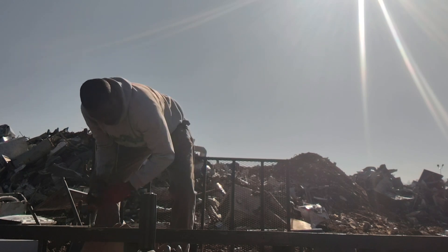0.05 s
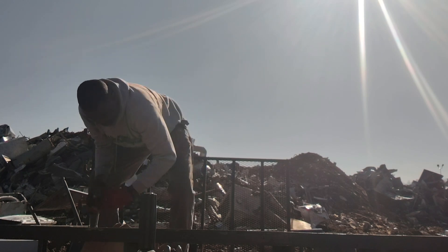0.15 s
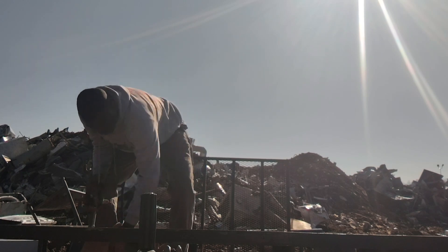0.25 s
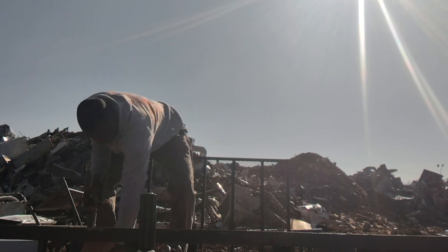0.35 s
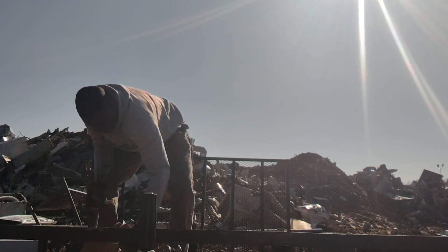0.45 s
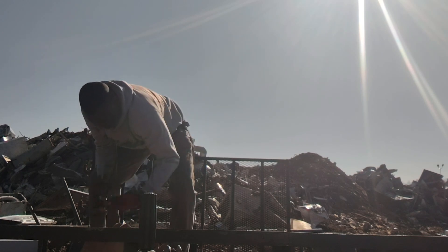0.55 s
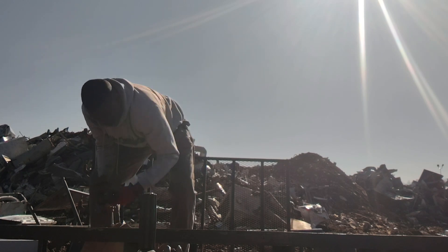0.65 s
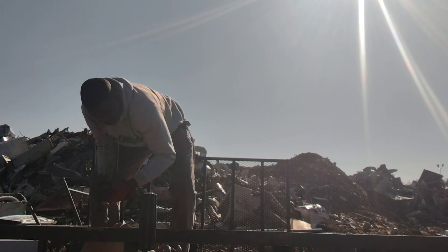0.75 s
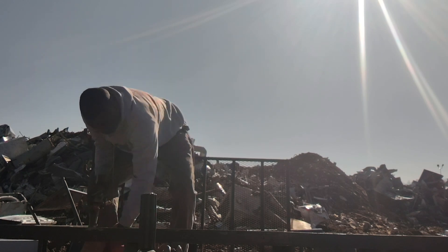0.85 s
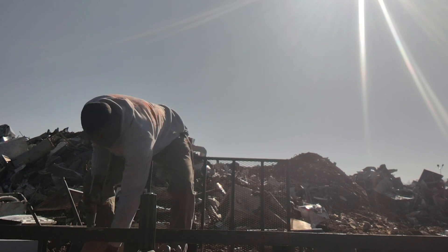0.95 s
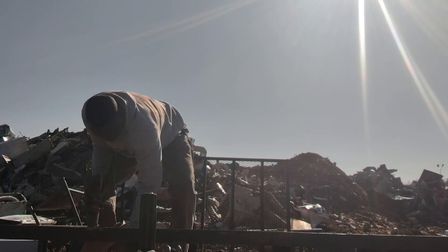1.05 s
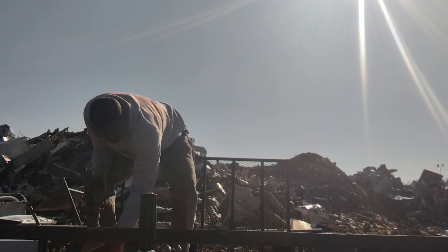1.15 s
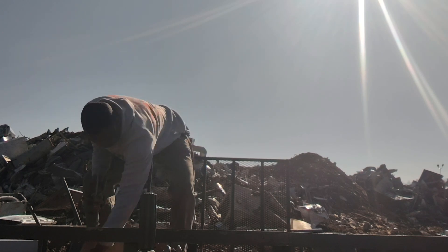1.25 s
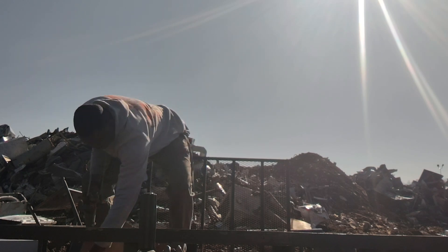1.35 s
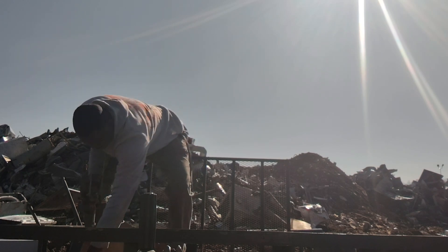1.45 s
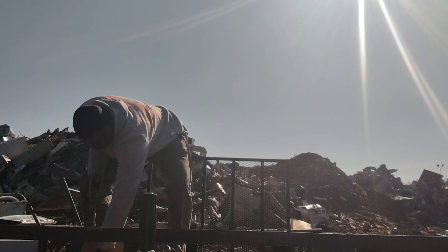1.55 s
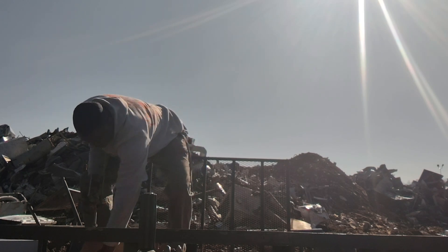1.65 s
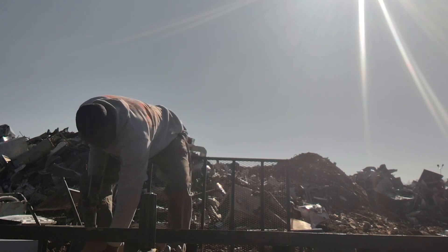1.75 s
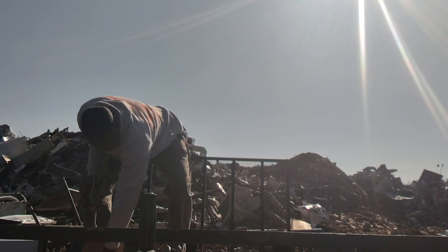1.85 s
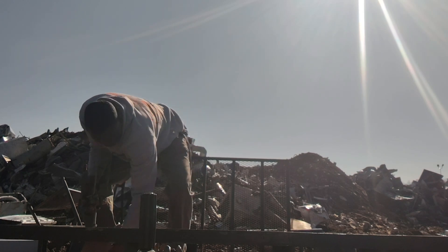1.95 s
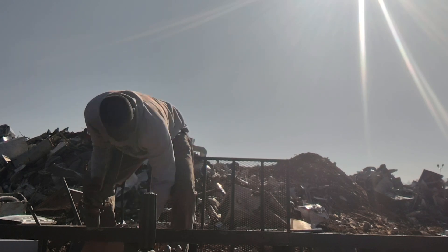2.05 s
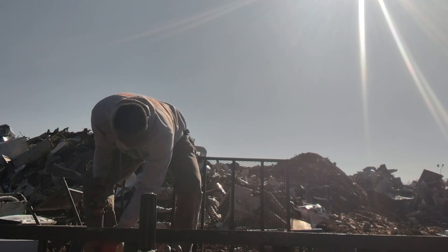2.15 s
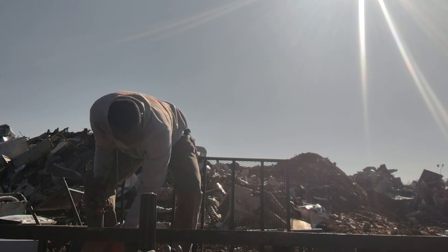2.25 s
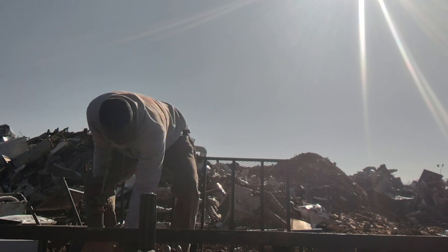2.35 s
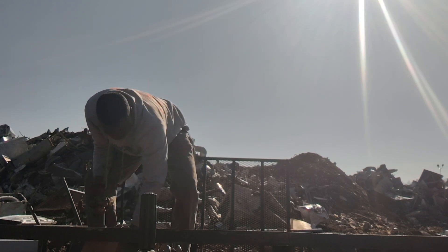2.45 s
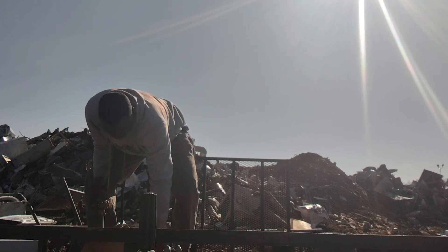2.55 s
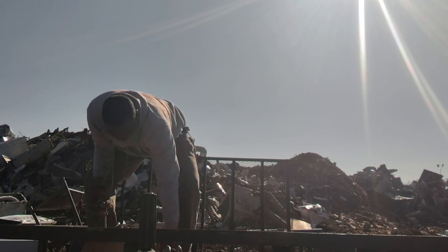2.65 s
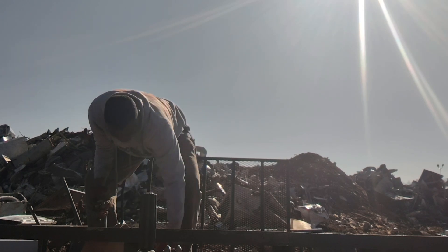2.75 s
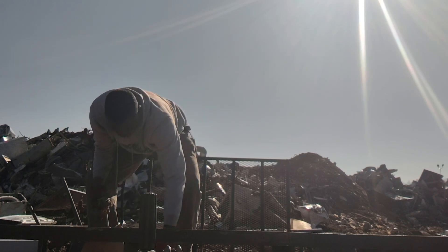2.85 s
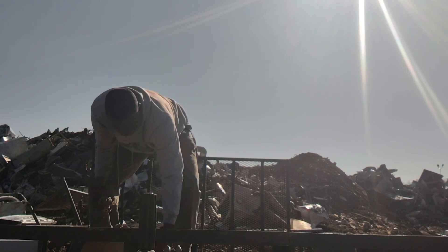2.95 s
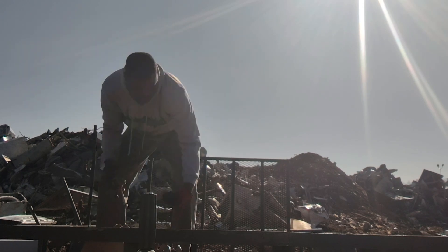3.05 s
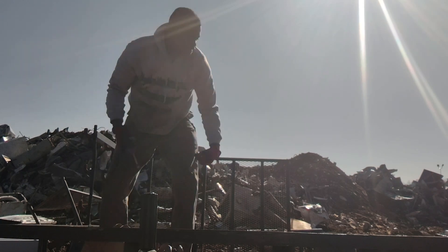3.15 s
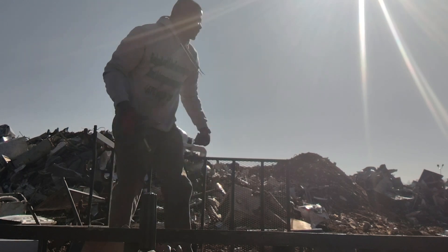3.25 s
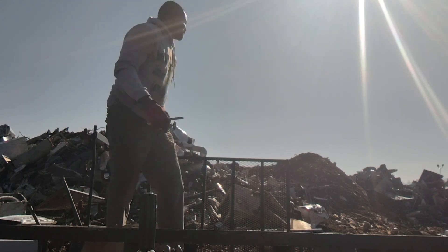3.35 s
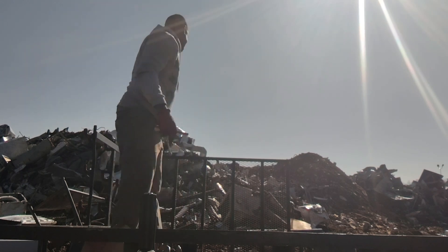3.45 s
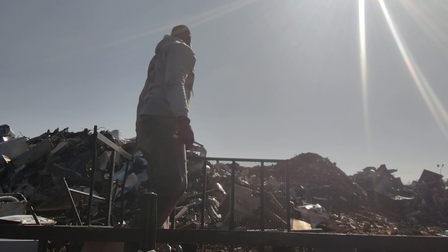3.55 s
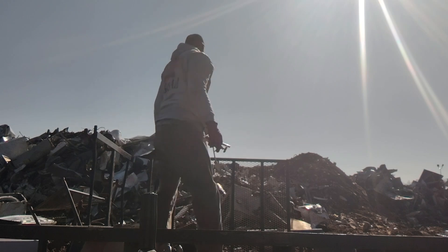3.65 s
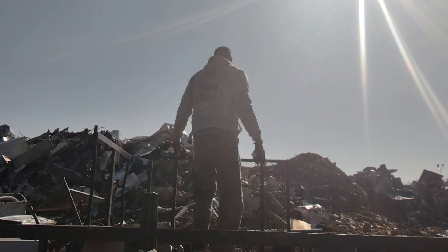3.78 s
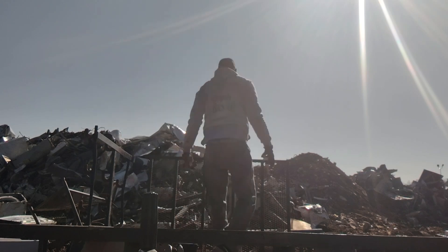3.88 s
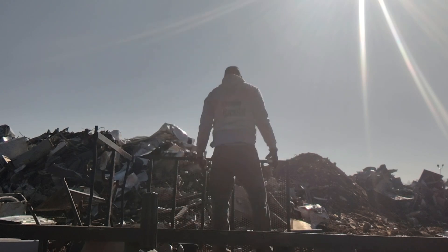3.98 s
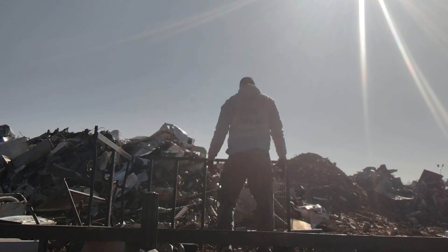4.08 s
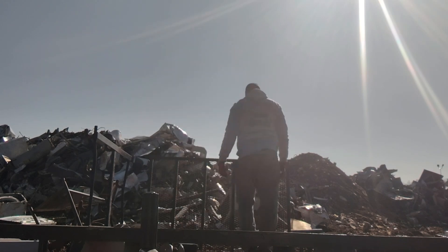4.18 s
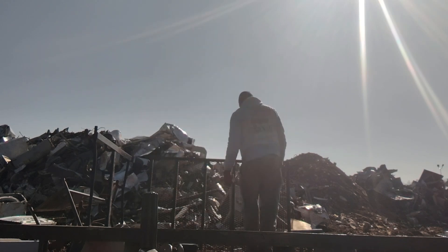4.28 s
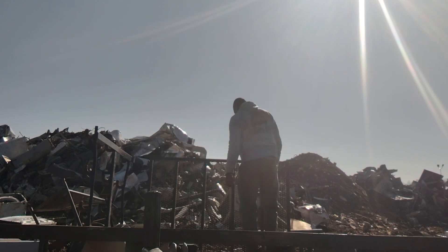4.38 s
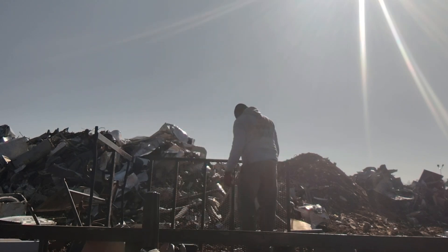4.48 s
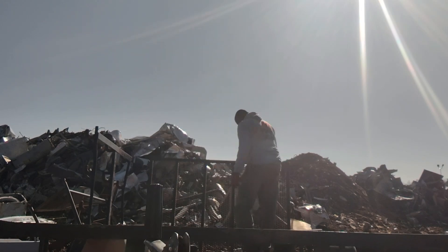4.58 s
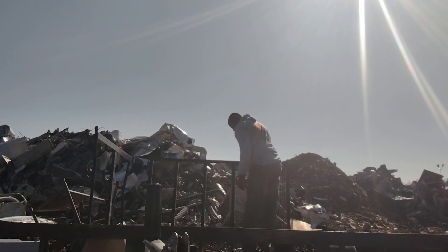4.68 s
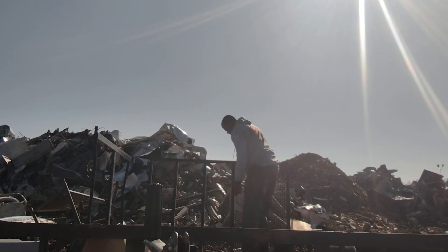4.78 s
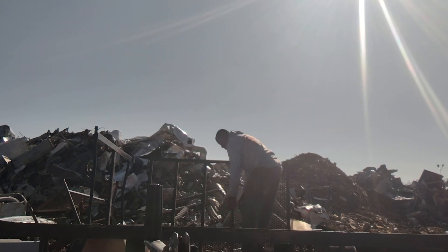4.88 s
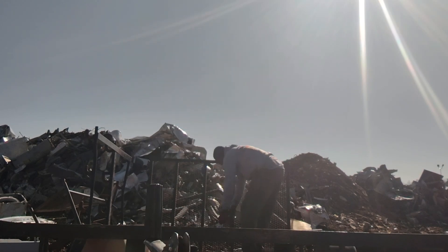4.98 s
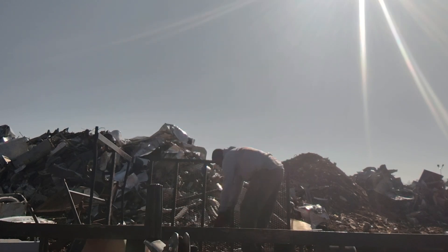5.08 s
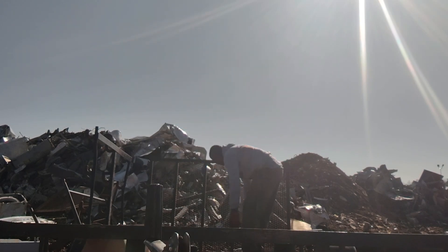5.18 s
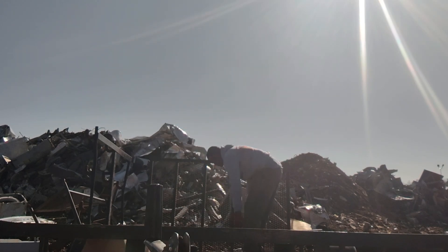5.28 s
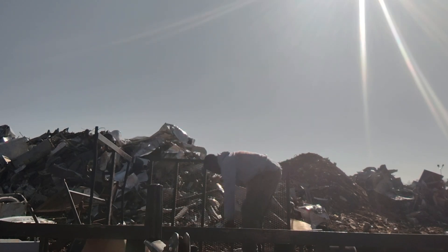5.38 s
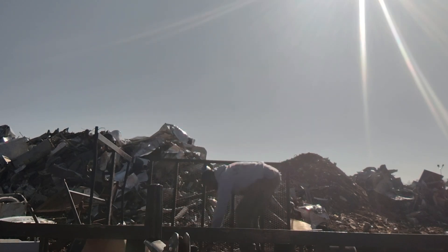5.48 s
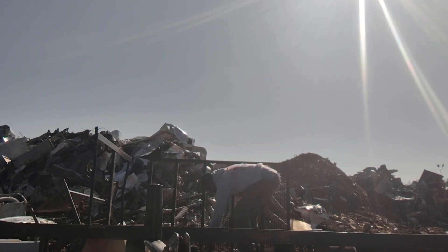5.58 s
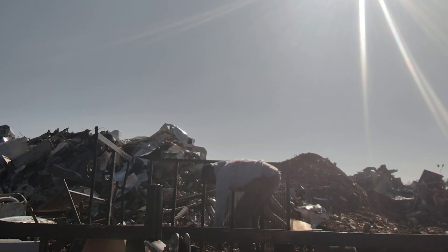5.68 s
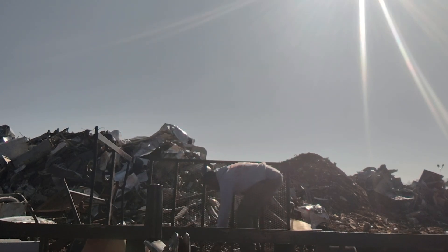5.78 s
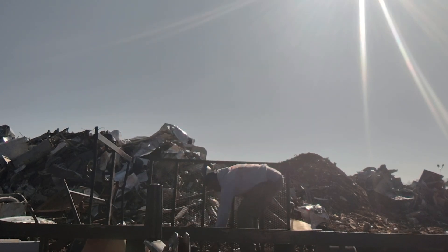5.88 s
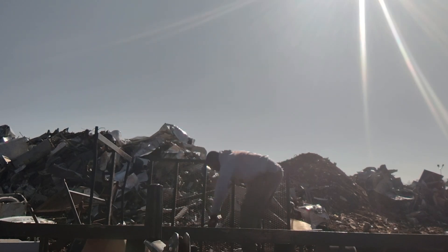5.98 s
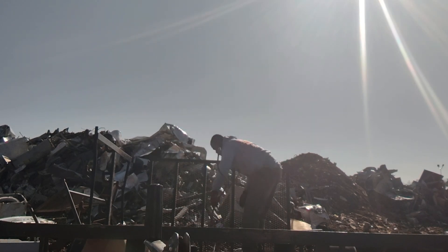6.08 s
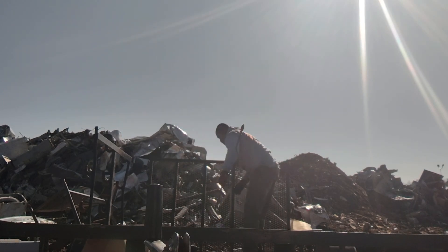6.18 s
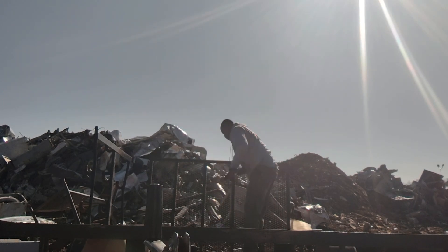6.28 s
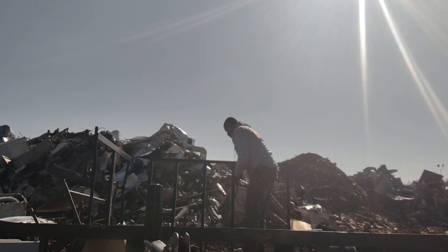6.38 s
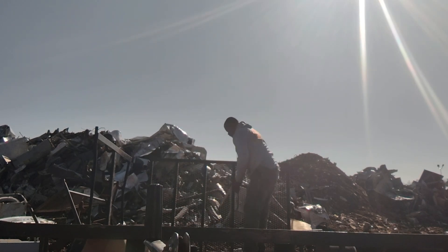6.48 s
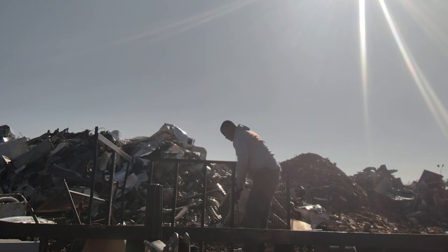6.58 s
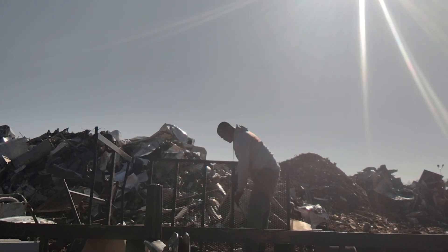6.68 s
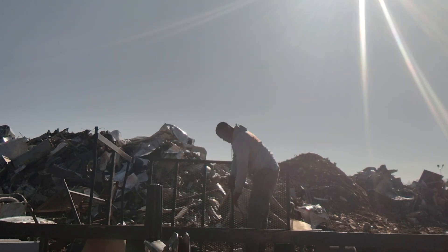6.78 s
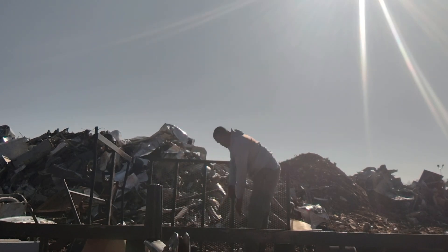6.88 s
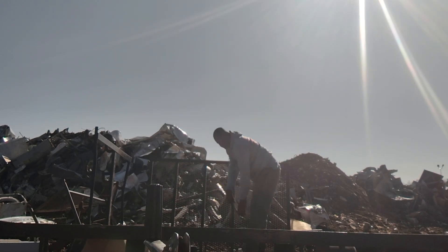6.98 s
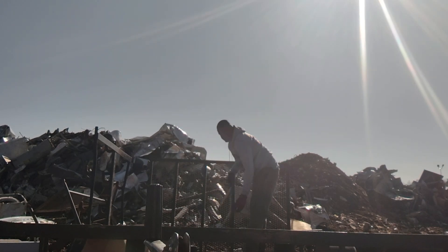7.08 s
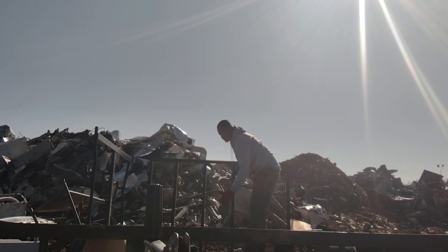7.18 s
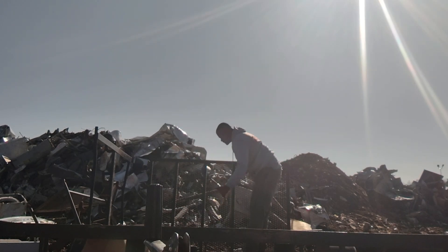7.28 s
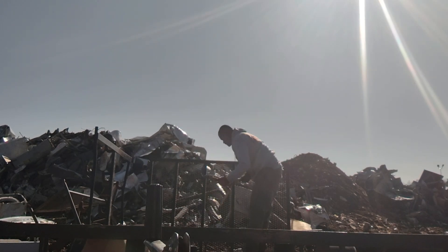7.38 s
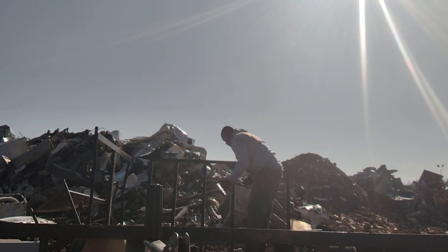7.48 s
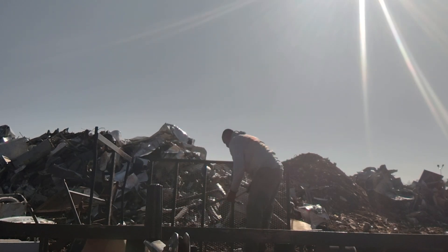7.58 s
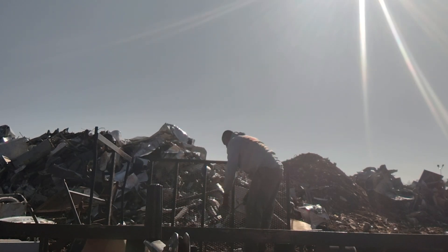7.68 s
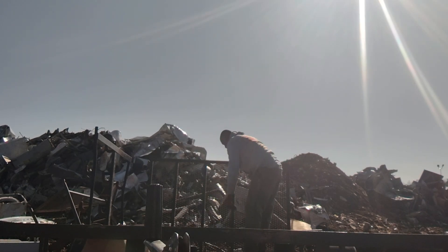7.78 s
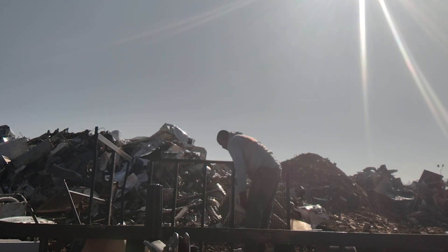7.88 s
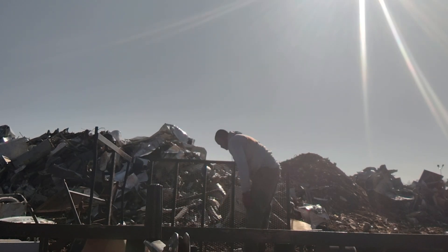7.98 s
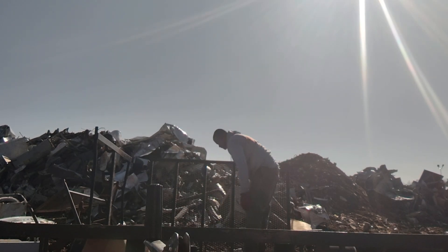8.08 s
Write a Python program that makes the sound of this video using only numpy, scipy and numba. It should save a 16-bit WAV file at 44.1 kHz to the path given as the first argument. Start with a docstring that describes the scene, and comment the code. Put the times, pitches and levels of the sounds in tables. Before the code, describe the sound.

Scrap metal shifted by hand outdoors: bright clanks and ringing pieces, knocks and scrapes on a trailer deck, heavier crashes near the middle and end.

```python
"""Shifting metal at a scrapyard

A worker shifts metal on a trailer in front of a two-microphone camera: knocks ring short modes of damped sheet,
and random contacts scuff the deck. To the right, clanks, rattles and thuds drive modes of scrap on a heap.
Some pieces there ring on with freely decaying modes; rubbed pieces squeal by stick-slip on a single mode.
A machine hums with wavering sine lines far to the left, over the filtered noise of the yard."""
import sys
import numpy as np
from scipy import signal
from scipy.fft import rfft, irfft, next_fast_len
from scipy.io import wavfile
from scipy.ndimage import uniform_filter1d
from numba import njit

SR = 44100
rng = np.random.default_rng(int(sys.argv[2]) if len(sys.argv) > 2 else 0)


def makeup_ratio(level_db):
    """Linear amplitude ratio for a level in decibels (20 dB per factor of ten)."""
    decades = np.asarray(level_db, float) / 20
    return 10 ** decades


def put_to_file(sound):
    """Save the sound as 16-bit audio at rate SR, in the file named by the first command-line argument."""
    columns = np.atleast_2d(sound).T  # one column per channel
    safe = np.clip(columns, -1, 1)
    whole_steps = np.round(safe * 32767)
    wavfile.write(sys.argv[1], SR, whole_steps.astype(np.int16))


N = 358533
T = np.arange(N) / SR
SHRILL_HZ, THIN_HZ, LOW_HZ, BRIEF_HZ = 11029, 4208, 1060, 4130  # modes named in the table of squeals


def colour(x, points):
    """Minimum-phase filtering: folding the cepstrum makes the response through (Hz, dB) points causal."""
    hz, db = np.transpose(points)
    grid = np.linspace(1, SR / 2, 1025)
    log_gain = np.interp(np.log(grid), np.log(hz), db) * np.log(10) / 20
    cepstrum = irfft(log_gain)
    cepstrum[1:1024] *= 2
    cepstrum[1025:] = 0
    impulse = irfft(np.exp(rfft(cepstrum)))
    return signal.fftconvolve(x, impulse)[:len(x)]


def unit(x):
    """Power normalisation: scales x to an rms of one."""
    return x / np.sqrt(np.mean(x ** 2) + 1e-18)


@njit
def ring(x, hz, gain, t60):
    """Modal superposition: a bank of exponentially decaying resonators driven by x."""
    y = np.zeros(len(x))
    for k in range(len(hz)):
        pole = np.exp((2j * np.pi * hz[k] - np.log(1000) / t60[k]) / SR)
        state = 0j
        for i in range(len(x)):
            state = state * pole + x[i]
            y[i] += gain[k] * state.imag
    return y


def add(out, start_s, x):
    """Linear superposition: mixes x into out from start_s."""
    first = int(start_s * SR)
    out[first:first + len(x)] += x[:max(len(out) - first, 0)]


def walk(rate):
    """Slow random modulation: levels held for 1 / rate s and slewed twice, with a spread near 1."""
    hold = int(SR / rate)
    steps = np.repeat(rng.standard_normal(N // hold + 1), hold)
    return 1.7 * uniform_filter1d(uniform_filter1d(steps, hold), hold)[:N]


def chatter(size, spread_db):
    """Random contact mechanics: dense tiny contacts, a few much stronger than the rest."""
    strength_db = np.minimum(spread_db * rng.exponential(size=size), 14)
    return rng.standard_normal(size) * makeup_ratio(strength_db)


def patter(rate, spread_db, t60):
    """Poisson-like impacts: scattered small taps, rate per second, swell a bed of fine contact noise."""
    strength_db = np.minimum(spread_db * rng.exponential(size=N), 15)
    taps = (rng.random(N) < rate / SR) * makeup_ratio(strength_db)
    bursts = signal.fftconvolve(taps, fade(t60, 0.0001, 1600))[:N]
    return chatter(N, spread_db=1.5) * (1 + 1.1 * bursts)


def fade(t60, rise_s, size, bend=1.0):
    """Energy decay: a quick rise, then a fall in dB; bend over 1 drops late, as bouncing scrap settles."""
    t = np.arange(size) / SR
    fall_db = -60 * (t / np.clip(t60, .02, 2)) ** bend
    return (1 - np.exp(-t / rise_s)) * makeup_ratio(fall_db)


def scrap(x, lo_hz, hi_hz, t60, dry, count):
    """Modal density: every bit of scrap has its own crowd of short modes, over the bare contact noise."""
    place_in_span = (np.arange(count) + rng.random(count)) / count
    hz = lo_hz * (hi_hz / lo_hz) ** place_in_span
    t60 = t60 * makeup_ratio(2 * rng.standard_normal(count))
    mode_db = 4 * rng.standard_normal(count)
    modes = ring(x, hz, makeup_ratio(mode_db) / np.sqrt(t60), t60)
    return unit(modes) + dry * unit(x)


def machine():
    """Tonal radiation over broadband noise: distant motor lines waver over the rumble and hiss of the yard."""
    # motor lines: hz, level_db
    motor_lines = [(181, -48), (285, -54.5), (322, -48.5), (642, -58)]
    # spectrum of the yard noise: hz, level_db
    yard_spectrum = [(100, -31), (165, -25), (290, -6.5), (380, -12.5), (1400, -24.5), (3200, -30.5),
                     (7000, -43.5), (16000, -58)]
    yard_db = -46.5
    hum = np.zeros(N)
    for hz, db in motor_lines:
        level = np.sqrt(2) * makeup_ratio(db + 1.8 * walk(14))
        phase = 2 * np.pi * np.cumsum(hz * (1 + 0.0034 * walk(3))) / SR
        hum += level * np.sin(phase)
    yard = unit(colour(rng.standard_normal(N), yard_spectrum))
    return hum + makeup_ratio(yard_db + walk(1.1)) * yard


def loose(axis):
    """Addition of powers: level of loose scrap (axis 0 deck, 1 heap), a restless bed plus swelling shifts."""
    # restless bed of loose scrap under the shifts: time_s, deck_scuff_db, heap_rattle_db
    restless = [(0, -42, -59.5), (2.6, -46, -71), (3.6, -52, -59), (5.7, -38.5, -57.5), (6.229, -41.5, -51),
                (6.57, -53, -67), (7.31, -81.5, -68.5), (8.13, -65, -88.5)]
    # a load of loose scrap shifts: loudest_s, deck_scuff_db, heap_rattle_db
    load_shifts = [(1.65, -29, -48), (2.17, -27, -37), (2.87, -32, -43.5), (4.19, -33.5, -69),
                   (4.82, -37.5, -44.5), (4.98, -35, -61), (5.53, -32, -32), (7.0, -44.5, -56.5),
                   (7.95, -48, -42.5), (8.1, -26.5, -48)]
    swell_db_per_s, settle_db_per_s = ((88, 108), (63.5, 144))  # each (deck, heap)
    bed = np.transpose(restless)
    power = makeup_ratio(np.interp(T, bed[0], bed[axis + 1])) ** 2
    for loudest_s, *db in load_shifts:
        rising_db = swell_db_per_s[axis] * (loudest_s - T)
        falling_db = settle_db_per_s[axis] * (T - loudest_s)
        power += makeup_ratio(db[axis] - np.where(T < loudest_s, rising_db, falling_db)) ** 2
    return np.sqrt(power)


def squeals(rows):
    """Stick-slip locked to one mode: a slightly rough sine that swells and lets go."""
    start_db, end_db = -11.5, -26.5  # against the loudest moment
    out = 0
    for start_s, loudest_s, end_s, hz, db in rows:
        on = uniform_filter1d(1. * ((T > start_s) & (T < end_s)), size=200)
        shape_db = np.interp(T, [start_s, loudest_s, end_s], [start_db, 0, end_db])
        level = np.sqrt(2) * on * makeup_ratio(db + shape_db + 0.7 * walk(90))
        out = out + level * np.sin(2 * np.pi * hz * T + .15 * walk(60))
    return out


def thuds():
    """Low-mode excitation: a soft, heavy push of noise rings a few modes of a hollow body."""
    # heavy thuds: start_s, peak_db, t60_s
    heavy_blows = [(0.041, -17.5, 0.39), (0.155, -4.5, 0.44), (1.974, -30, 0.85), (5.579, -11.5, 0.92),
                   (5.619, -15, 0.33)]
    # modes of the hollow body: hz, width_hz, level_db
    hollow_modes = [(342, 21, -18.5), (458, 33, -3.5), (491, 99, 4.5), (620, 110, -5), (756, 120, -9.5)]
    hz, width_hz, mode_db = np.transpose(hollow_modes)
    out, size = np.zeros(N), SR // 2
    for s, db, t60 in heavy_blows:
        envelope = fade(t60, 0.00054, size) + 3 * fade(0.045, 0.0003, size)
        push = rng.standard_normal(size) * envelope
        # a wider mode dies sooner
        sound = ring(push, hz, makeup_ratio(mode_db) * np.sqrt(width_hz), 3.8 / width_hz)
        add(out, s, makeup_ratio(db) * sound / np.abs(sound).max())
    return out


def pieces():
    """Free vibration: each blow rebalances a piece's modes; bounces roughen them until a touch damps the ring."""
    # four ringing pieces, each a list of modes: hz, level_db, t60_s
    # and then a list of blows: start_s, level_db, rings_freely_for_s
    ringing_pieces = [ ([(3450, -1, 0.67), (4054, -2, 0.18), (5712, -1, 0.058), (6444, -23, 0.25),
                      (6850, -7.5, 0.18), (8590, -9, 0.39), (10590, -7, 0.13), (11920, -12, 0.12),
                      (12400, -7, .1), (2153, -17, 0.18)], [(0.426, -15.5, 0.29), (0.455, -17.5, 0.25),
                      (0.49, -26, 0.22), (0.76, -24, 0.1)]), ([(1250, -4.5, 0.26), (1322, -10.5, 0.99),
                      (1782, -16.5, 1), (3515, -11, 0.36), (4525, -14, .25), (5071, -26, .3),
                      (5962, -5.5, 0.19), (6778, -19, 0.17), (7693, -25, 0.2), (10530, -26, 0.17)],
                      [(1.487, -18.5, 0.39), (1.524, -18, 0.38), (1.628, -27.5, 0.2)]),
                      ([(700, -17.5, 0.52), (1093, 0.5, 0.37), (1143, -8, 0.29), (1244, -10, 0.37),
                      (1755, -6, 0.27), (3688, -3.5, 0.31), (5416, -12, 0.28), (5868, -14, .25),
                      (6800, -11.5, 0.15)], [(2.094, -24, 0.28), (2.15, -18.5, 0.23), (2.22, -26.5, 0.15)]),
                      ([(608, -12, 0.26), (1770, -10.5, .3), (5090, -3.5, 0.33), (5280, -4, .18),
                      (5870, 1.5, 0.11), (4500, -18, .09), (6700, -18, .18), (8510, -0.5, 0.17),
                      (10550, -11, 0.069), (12420, -12, 0.1)], [(2.708, -21, 0.12), (2.838, -19.5, 0.18),
                      (2.905, -29.5, 0.14)]), ]
    out, size = np.zeros(N), SR // 2
    age_s = np.arange(size) / SR
    onset = np.minimum(np.arange(size) / 30, 1)
    for modes, blows in ringing_pieces:
        hz, mode_db, t60 = np.transpose(modes)
        for s, db, free_s in blows:
            push = chatter(size, spread_db=4) * fade(.2, .001, size)
            push *= .8 / np.linalg.norm(push)
            push[0] = .8  # the first blow
            # bent metal splits each mode into a close pair that beats
            twin_hz = hz * (1 + .01 * rng.standard_normal(len(hz)))
            # each blow finds another spot
            spot_db = 2 * rng.standard_normal(len(hz))
            gain = makeup_ratio(db + mode_db + spot_db)
            sound = ring(push, hz, gain, t60) + ring(push, twin_hz, gain, .5 * t60)
            touch = makeup_ratio(-400 * np.clip(age_s - free_s, 0, None))  # 400 dB/s once touched
            add(out, s, sound * onset * touch)
    return out


def heap():
    """Repeated impact: clanks are bouncing contacts that die away through random modes; loose bits rattle."""
    # clanks: start_s, level_db, low_ring_against_treble_db, t60_s
    clanks = [(0.0435, -27.5, 15.5, 0.43), (0.16, -13, 13.5, 0.22), (0.4216, -13, 5.5, 0.28),
              (0.5683, -19.5, 9, 0.25), (0.7598, -9.5, 3.5, 0.25), (1.18, -30.5, 16.5, 0.51),
              (1.2613, -24.5, 10.5, 0.16), (1.4834, -8, -3.5, 0.48), (1.627, -20.5, -2, 0.83),
              (1.7107, -18, -12, 0.12), (1.977, -21, 17, 0.19), (2.0312, -19, -24, 0.14),
              (2.0922, -7, -3, 0.36), (2.1406, -13, -7.5, 0.51), (2.3296, -38.5, 21, 0.73),
              (2.7089, -9, 4, 0.16), (2.827, -11, -16, 0.32), (2.9028, -29.5, -9, 0.58),
              (3.026, -21.5, -2, 0.062), (3.1896, -29, 14.5, 0.79), (3.34, -35, 15.5, 0.16),
              (3.51, -31, 11, 0.085), (3.628, -29.5, 4, 0.33), (3.8123, -27.5, 8.5, 0.52),
              (4.022, -25, 7.5, 0.39), (4.1762, -18.5, -9, 0.063), (4.3118, -28.5, 13.5, 0.51),
              (4.6066, -25.5, 5.5, 0.25), (4.8995, -17, 16, 0.4), (5.0443, -17.5, 6, 0.23),
              (5.136, -22.5, 12.5, 0.27), (5.2397, -19.5, 7.5, 0.23), (6.0302, -8.5, -5.5, 0.25),
              (6.0686, -29.5, 24, 0.36), (6.82, -34, 7, 0.38), (6.91, -18, 4, 0.27),
              (7.1403, -38, 19, 0.27), (7.751, -7, -3, 0.57), (7.7672, -7.5, 4.5, 0.67),
              (7.8792, -19.5, 11, 0.68), (8.0433, -12, -10, 0.5)]
    # treble of struck scrap: hz, level_db
    treble = [(2500, 7.5), (3500, 13), (5500, 10), (8000, 8), (11000, 8), (13500, 6.5), (16000, 3)]
    crest_db = 19  # allowance for a clank's peak over its mean level
    moves_off_s = 3.9
    high, low, size = np.zeros(N), np.zeros(N), SR // 2
    for s, db, low_db, t60 in clanks:
        shape = fade(t60, 0.00036, size, bend=1.116)
        steps = np.repeat(rng.standard_normal(size // 300 + 1), 300)
        bounce = uniform_filter1d(steps, size=300)[:size]
        # uneven rebounds after the first blow
        unevenness = makeup_ratio(2.9 * bounce * (1.5 - shape))
        push = chatter(size, spread_db=0.5) * shape * unevenness
        scale = makeup_ratio(db - crest_db) * np.sqrt(np.mean(shape ** 2))
        add(high, s, scale * scrap(push, 2500, 15500, .04, 1.2, count=70))
        add(low, s, scale * makeup_ratio(low_db) * scrap(push, 550, 2800, .05, 0, count=30))
    rattle = unit(patter(20, 5.4, 0.058))
    high += rattle * loose(axis=1)
    high = colour(high, [(1200, -31.5)] + treble)
    # once the work moves further off, the treble layer weakens, its top the most
    distant = colour(high, [(6000, -3.0), (14000, -5.5)])
    return np.where(T < moves_off_s, high, distant) + low


def deck():
    """Damped plate impact: a sharp push rings sheet at its body pitch under a tick; friction drags and scuffs."""
    # knocks: start_s, body_peak_db, lowest_body_mode_hz, tick_against_body_db
    knocks = [(0.068, -31, 1200, 9.5), (0.679, -20, 1640, 3.5), (0.711, -12.5, 1540, -8.5),
              (1.316, -20, 1210, -11), (1.907, -17.5, 1430, 3), (2.425, -16.5, 1290, -26),
              (2.504, -19.5, 1410, -8.5), (2.644, -11, 1960, -8), (2.789, -12.5, 980, -29),
              (4.069, -24, 1400, -7.5), (4.176, -20.5, 1460, -16.5), (4.369, -22.5, 1620, -17),
              (4.783, -19, 800, 9.5), (4.835, -10.5, 860, -3.5), (4.913, -23, 315, -13),
              (4.957, -18.5, 480, -1), (5.084, -13.5, 1600, -24), (5.214, -17, 1210, -14),
              (5.363, 0, 1500, -23), (5.385, -3, 1010, -19.5), (5.42, -3.5, 1360, -11),
              (5.489, -10.5, 1610, 2), (5.523, -6.5, 1480, -1.5), (5.536, -8, 1100, -13),
              (5.369, -7, 1300, -12), (5.583, -7, 450, -28), (5.6, -3, 453, -30), (5.804, -19, 1260, 1.5),
              (5.842, -23, 348, 3), (5.878, -14.5, 675, -9.5), (5.961, -16.5, 1390, -35),
              (6.056, -5.5, 1390, -26), (6.119, -15.5, 1390, -20), (6.165, -15.5, 304, -27),
              (6.192, -19, 304, -23), (6.238, -17.5, 850, -17.5), (6.263, -23.5, 1178, -11),
              (6.344, -17.5, 1420, -3.5), (6.372, -21, 1340, -9), (6.397, -9.5, 1310, -4),
              (6.871, -5, 754, -21), (7.597, -36, 1200, -11.5), (8.027, 0.5, 1100, -27),
              (8.043, -4.5, 1210, -33.5), (8.08, -5, 1184, -24), (8.096, -2.5, 1390, -16.5),
              (8.124, -9, 1440, -26)]
    # pieces dragged over the deck: start_s, length_s, grind_db, treble_db
    drags = [(2.581, 0.063, -30.5, -32), (4.807, 0.054, -26.5, -49), (5.354, 0.21, -21.5, -42),
             (8.011, 0.17, -20, -51)]
    # spectrum of scuffing: hz, level_db
    scuff_spectrum = [(120, -72), (200, -27.5), (485, -7.5), (926, -8), (1060, -4.5), (1710, -6),
                      (3500, -24.5), (4550, -24), (7700, -120)]
    knock_t60_s, body_span_hz = 0.28, 770  # the sheet shudders on after each knock
    drag_rise_s = 0.0054
    out, ticks, size = np.zeros(N), np.zeros(N), SR // 4
    for s, db, hz, tick_db in knocks:
        envelope = fade(knock_t60_s, .0003, size) + 10 * fade(.012, .0002, size)
        push = chatter(size, spread_db=2.5) * envelope
        push[8] += 3 * np.abs(push).mean() * size / 200  # the sharp blow itself
        body = scrap(push, hz, hz + body_span_hz, 0.014, 0, count=10)
        add(out, s, makeup_ratio(db) * body / np.abs(body).max())
        tick = scrap(push, 2800, 15000, 0.025, 6.3, count=30)
        add(ticks, s, makeup_ratio(db + tick_db) * tick / np.abs(tick).max())
    grind = loose(axis=0)
    for s, length_s, grind_db, treble_db in drags:
        release = makeup_ratio(-900 * np.clip(T - s - length_s, 0, None))  # falls by 900 dB/s
        on = np.where(T > s, release, 0) * np.clip((T - s) / drag_rise_s, 0, 1)
        grind += makeup_ratio(grind_db) * on
        ticks += makeup_ratio(treble_db) * on * unit(patter(59, 3.0, .03))
    scuff = unit(colour(patter(90, 1.5, 0.03), scuff_spectrum))
    bright_ticks = colour(ticks, [(1500, -9.0), (3000, 10.5), (16000, -1)])
    return out + bright_ticks + scuff * grind


def place(x, lag_s, shade_db, wet_db, t60):
    """Interaural-like lag, shading and scattering: left hears x later by lag_s, its treble shaded by the camera."""
    size = next_fast_len(N + SR // 8)
    hz = np.fft.rfftfreq(size, 1 / SR)
    side = np.array([[1], [-1]])  # left, right
    lag = np.exp(-1j * np.pi * hz * lag_s * side)
    shade = makeup_ratio(side * shade_db / 2 * np.clip(hz / 8000, 0, 1))
    out = rfft(x, size) * lag * shade
    # scattering by nearby scrap: its colour drifts slowly and differs between left and right
    drift = np.pi * walk(4)
    for share in (np.cos(drift), np.sin(drift)):
        tail = rng.standard_normal((2, SR // 8)) * fade(t60, 0.0025, SR // 8)
        tail *= makeup_ratio(wet_db) / np.linalg.norm(tail, axis=1, keepdims=True)
        scattering = np.clip(hz / 4500, .6, 2.6)  # long waves pass the scrap alike
        out += rfft(x * share, size) * rfft(tail, size) * scattering
    return irfft(out, size)[:, :N]


def scene():
    """Spatial superposition: heap to the right, deck ahead, machine to the left."""
    # rubbed pieces by location: start_s, loudest_s, end_s, pitch_hz, loudest_db
    rubbed = {"deck": [(5.39, 5.443, 5.465, SHRILL_HZ, -18), (5.455, 5.47, 5.56, SHRILL_HZ, -23),
              (5.395, 5.46, 5.53, THIN_HZ, -25)], "heap": [(2.84, 2.965, 3.1, LOW_HZ, -19),
              (4.65, 4.697, 4.712, BRIEF_HZ, -37)]}
    # delay of the left side by source: left_lag_s
    left_lag_s = {"heap": 7.2 / SR, "deck": 0., "machine": -7 / SR}
    scatter_t60_s = .016
    right = heap() + pieces() + thuds() + squeals(rubbed["heap"])
    ahead = deck() + squeals(rubbed["deck"])
    right_placed = place(right, left_lag_s["heap"], -3.5, -6.0, scatter_t60_s)
    ahead_placed = place(ahead, left_lag_s["deck"], -1.2, 0.0, scatter_t60_s)
    left_placed = place(machine(), left_lag_s["machine"], 1.5, -13.5, 0.045)
    return right_placed + ahead_placed + left_placed


def band_limit(x):
    """A steep low-pass at the top of the band."""
    return signal.sosfilt(signal.butter(12, 16520, fs=SR, output="sos"), x)


def record(dry):
    """Transducer response: microphones drop the bass, add faint rumble, round the peaks and cut the top."""
    low_cut_hz, rumble_db, top_hz = 208.5, -68.5, 16300
    bass_cut = signal.butter(7, low_cut_hz, "high", fs=SR, output="sos")
    cut = signal.sosfilt(bass_cut, dry)
    rumble_spectrum = [(20, -10.0), (150, 11.5), (300, -25.0)]  # hz, level_db
    common, left, right = (unit(colour(rng.standard_normal(N), rumble_spectrum)) for _ in range(3))
    cut = cut + makeup_ratio(rumble_db) * (common + np.array([left, right]))
    rounded = np.tanh(cut)
    top_cut = signal.ellip(8, .5, 60, top_hz, fs=SR, output="sos")
    finished = signal.sosfilt(top_cut, rounded)
    return band_limit(finished)


dry = scene()
out = record(dry)
put_to_file(out)
```